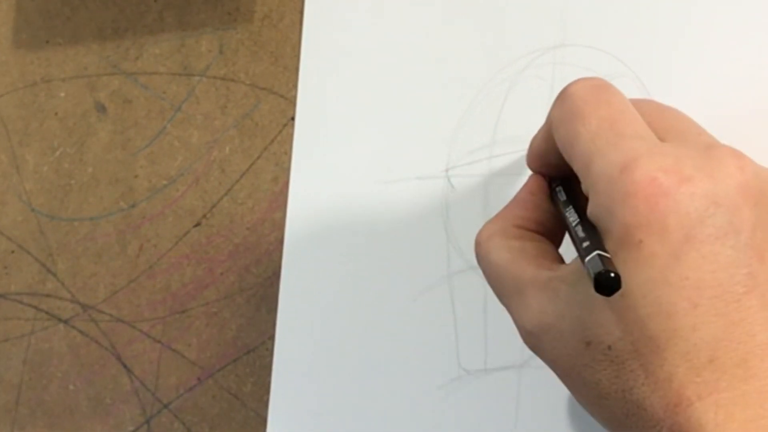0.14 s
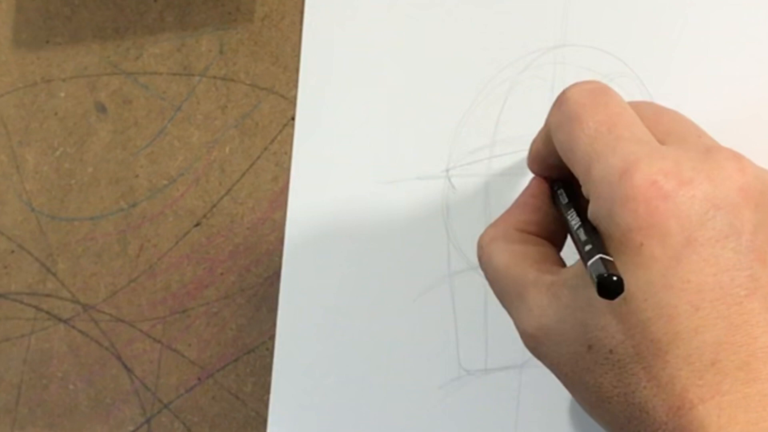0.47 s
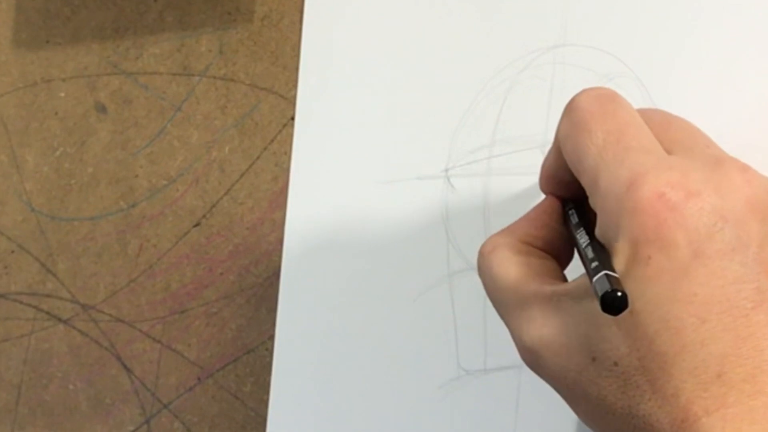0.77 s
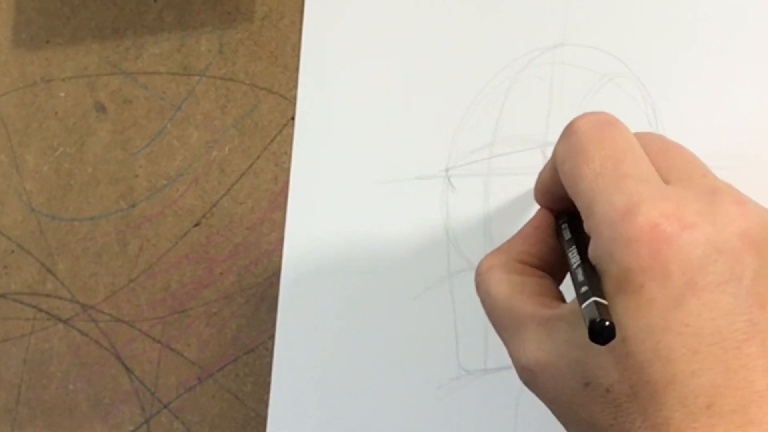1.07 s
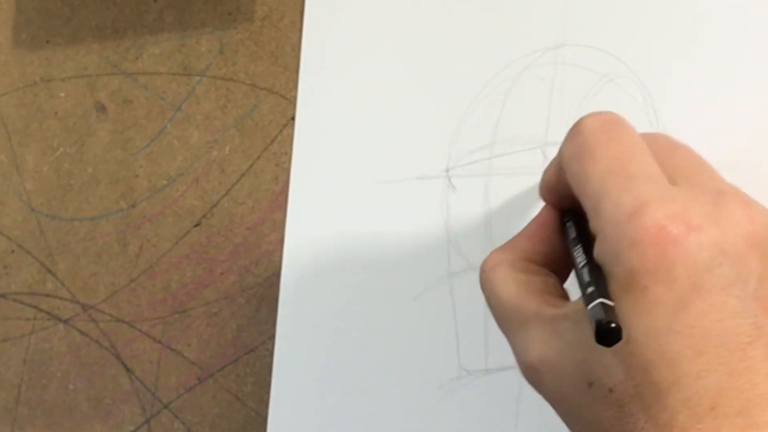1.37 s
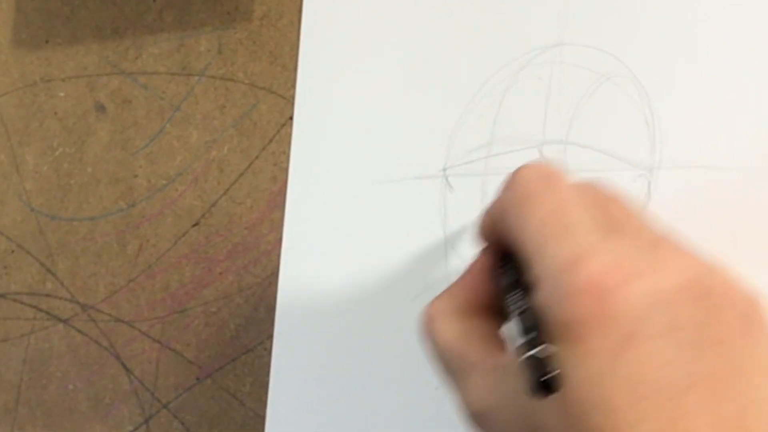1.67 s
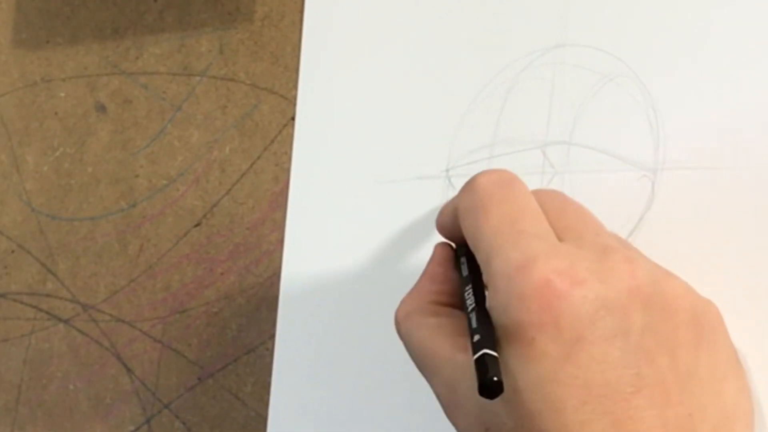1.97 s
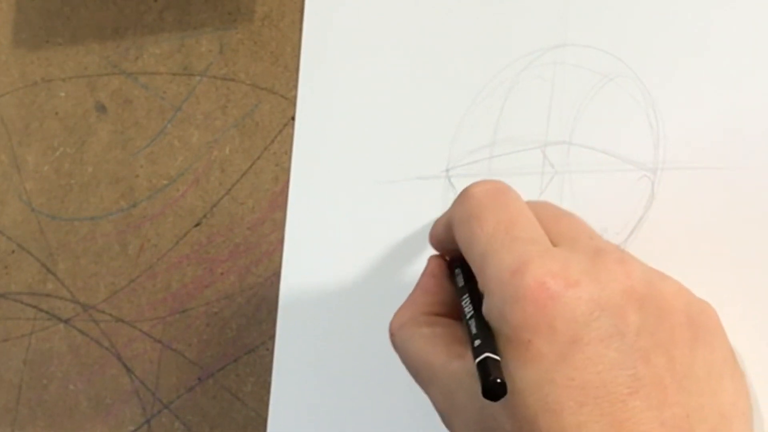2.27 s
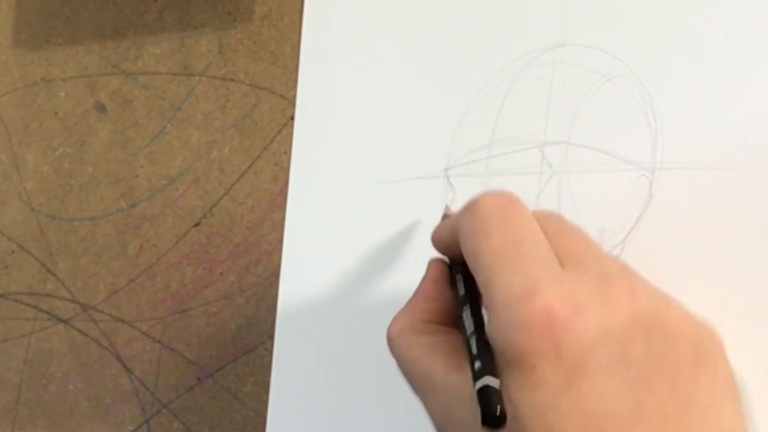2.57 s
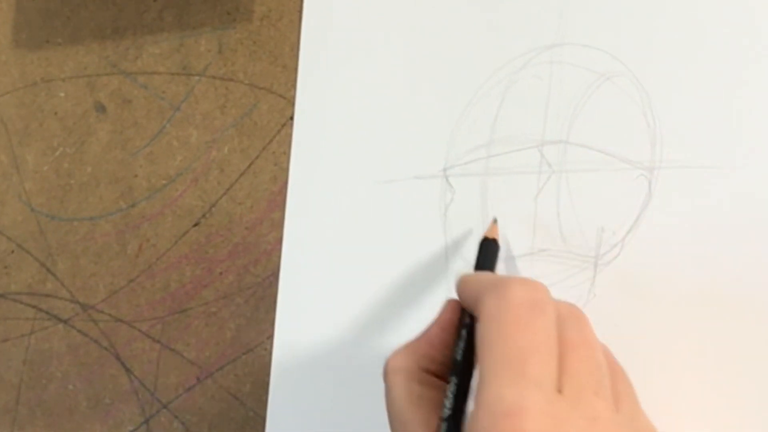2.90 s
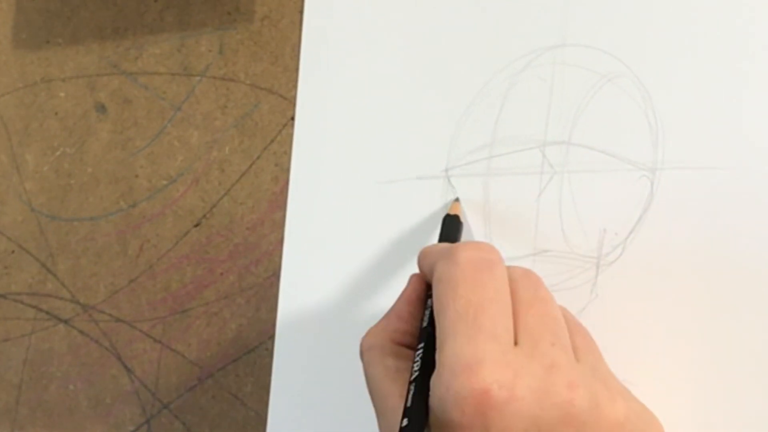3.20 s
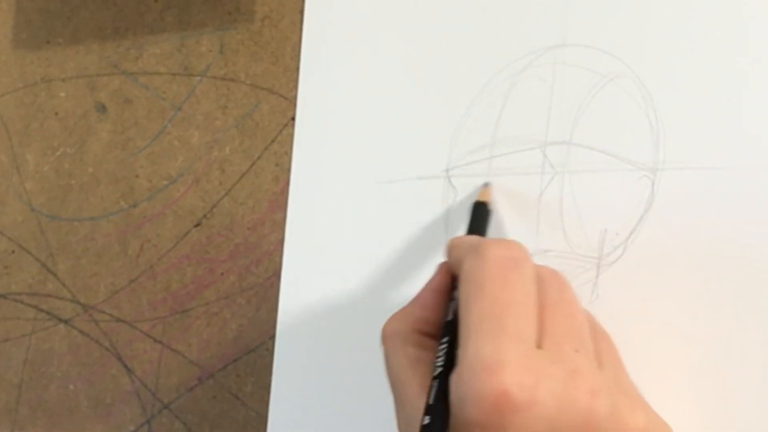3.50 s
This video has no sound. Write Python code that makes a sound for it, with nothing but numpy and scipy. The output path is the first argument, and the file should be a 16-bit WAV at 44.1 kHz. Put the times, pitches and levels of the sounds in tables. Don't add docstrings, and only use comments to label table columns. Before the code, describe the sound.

Pencil on paper, close and mono: four light, quick scratches at 0.05-0.6 s, then a dull bump and faint hand brush. Firmer strokes at 1.0-1.45 s lead to an airy slide with soft bumps until 1.8 s. Brisk, brighter strokes run 2.0-2.4 s, then hand brushes until 3.1 s with tiny paper ticks. Overlapping scratches finish at 3.3-3.65 s over quiet room rumble, distant drone and hiss.

```python
import sys
import numpy as np
from scipy import signal
from scipy.fft import rfft, irfft
from scipy.io import wavfile
from scipy.ndimage import uniform_filter1d

SR = 44100
rng = np.random.default_rng(int(sys.argv[2]) if len(sys.argv) > 2 else 0)


def convert_level_to_amplitude(level_db):
    exponent = np.asarray(level_db, float) / 20
    return 10 ** exponent


def log_audio(samples):
    frames = np.atleast_2d(samples).T
    limited = np.clip(frames, -1, 1)
    pcm = np.round(limited * 32767).astype(np.int16)
    wavfile.write(sys.argv[1], SR, pcm)


N = 160965

# start in seconds, length in seconds,
# shaft level in dB, upper shaft modes in dB relative to the lower, desk level in dB.
STROKES = [
    [(.06, 0.068, -77, 1, -66), (.095, 0.22, -73.5, 4, -64.5), (.268, 0.17, -73, 2.5, -62),
     (.455, 0.17, -70, 3, -62.5)],
    [(.97, 0.1, -78, -10, -77), (1.085, 0.14, -64, -1, -54), (1.212, 0.13, -66, -1, -55.5),
     (1.335, 0.11, -64, -1, -55), (3.3, 0.26, -68.5, -6, -63.5), (3.355, 0.17, -66, -12.5, -65.5),
     (3.37, 0.069, -76, -12, -53.5), (3.525, 0.17, -69.5, -4, -63)],
    [(1.96, 0.12, -85, -13.5, -79.5), (2.055, 0.13, -61, -5, -58.5), (2.2, 0.12, -65.5, -2.5, -60.5),
     (2.308, 0.089, -61, -2.5, -57), (2.398, 0.033, -73, -2, -80)],
]
# frequency in Hz, width in Hz, level in dB at each of the three places.
SHAFT_LOW = [(5890, 1060, -15, -10.5, -14.5), (7700, 1200, -13, -20.5, -22), (9300, 640, -6, -3, -0.5),
             (9910, 1060, -2.5, -7.5, -8.5), (11480, 1700, -6, -12, -12.5)]
# frequency in Hz, width in Hz, level in dB at each place.
SHAFT_HIGH = [(12300, 1000, -8, -11, -3), (13300, 1100, -11, -1, 5.5), (13120, 850, 0.5, -11, -15),
              (14300, 2100, -6, -8, -5)]
# frequency in Hz, width in Hz, level in dB at each of the three places.
DESK_MODES = [(147, 25, -5, -9, -10), (250, 20, -10, -6.5, -4.5), (285, 13.5, -9, -8, -6),
              (436, 50, -5.5, -2.5, -2.5), (606, 41, -2.5, -3, -1), (689.6, 42, -0.5, -3.5, -5.5),
              (893, 135, -4.5, -7.5, -12.5), (1170, 124, 0.5, -8.5, -6.5), (1520, 690, -1, -7.5, -5),
              (2167, 570, -6, -9.5, -7.5), (2590, 210, -13, -15, -16.5), (3260, 480, -9.5, -20.5, -15.5)]
# start in seconds, length in seconds, level in dB, frequency in Hz, width in Hz.
DIGS = [(0.067, 0.19, -74, 1190, 160), (0.13, 0.08, -78, 2050, 200), (0.273, 0.16, -68, 1225, 130),
        (0.27, 0.11, -68, 620, 90), (0.309, 0.13, -65.5, 285, 40), (0.456, 0.15, -74.5, 3145, 150),
        (0.482, 0.12, -80, 646, 70), (0.47, 0.087, -71, 175, 40), (0.604, 0.088, -63.5, 220, 109),
        (1.111, 0.11, -59, 603, 70), (1.221, 0.068, -57.5, 610, 120), (1.24, 0.039, -55, 460, 60),
        (1.345, 0.088, -66.5, 490, 90), (1.28, 0.05, -66, 290, 60), (1.36, 0.05, -76, 2580, 200),
        (1.462, 0.053, -66.5, 260, 180), (2.07, 0.12, -68, 612, 70), (2.187, 0.069, -72, 300, 50),
        (2.314, 0.077, -63.5, 620, 100), (3.376, 0.071, -56.5, 590, 160), (3.326, 0.12, -60.5, 257, 40),
        (3.38, 0.055, -70.5, 3000, 1800), (3.54, 0.18, -64, 270, 70), (3.604, 0.03, -76, 1250, 150)]
# start in seconds, length in seconds, fine hiss in dB, coarse rub in dB,
# share of the length spent speeding up.
SLIDES = [
    (0.705, 0.33, -73, -73.5, 0.38),
    (1.42, 0.4, -57.5, -69.5, 0.47),
    (2.43, 0.41, -60.5, -69, 0.22),
    (2.75, 0.36, -65.5, -73, 0.42),
]
# frequency in Hz, width in Hz, level in dB in each of the four slides.
SHEET_FINE = [(6100, 10000, -14, -10.5, -9.5, -9.5), (10550, 2300, -1, -1, -1.5, 0),
              (13300, 3600, -3, -1, -2, -1.3), (15250, 2000, -6, -3, -4, -4.5)]
# frequency in Hz, width in Hz, level in dB.
SHEET_COARSE = [(300, 280, -14), (760, 230, -5), (1570, 310, -2), (1970, 450, -5.5), (3270, 960, -5.5)]
# start in seconds, length in seconds, level in dB.
DRAGS = [
    [(0.99, 0.18, -69), (1.27, 0.079, -63), (1.43, 0.19, -68), (2.965, 0.087, -70), (2.97, 0.53, -67)],
    [(2.7, 0.05, -74), (2.75, 0.1, -80), (2.86, 0.18, -81)],
    [(1.5, 0.25, -68.5), (2.5, 0.14, -66), (2.865, 0.21, -79)],
]
# frequency in Hz, width in Hz, level in dB under each of the three pressures.
WRIST_MODES = [(270, 90, -6, -32.5, -30), (636, 260, -2.5, -27, -3), (950, 210, -0.5, -32, -20),
               (1153, 120, -10, -30, -9), (1422, 210, -5.5, -27, 2), (1668, 90, -4, -27, -0.5),
               (2025, 510, -20, -18, 3.5), (2590, 180, -20, -13, -3.5), (3480, 550, -25, 5, -12.5)]
# time in seconds, peak in dB, pulse width in seconds.
SNAPS = [(1.4733, -52, .0002), (1.7792, -46, .000035), (3.103, -47.5, .000035), (3.206, -53, .00003),
         (3.617, -50, .00005)]
# time in seconds, level in dB, frequency in Hz.
BUMPS = [(0.616, -54, 232), (.64, -49.5, 150), (1.465, -51.5, 300), (1.483, -47.5, 166), (1.232, -49, 620),
         (2.25, -48, 286)]
# frequency in Hz, width in Hz, level in dB.
DRONE = [(37, 38.4, 1.5), (62, 13.7, 4.5), (80.5, 33, -6), (171, 5.3, -13)]
# frequency in Hz, level in dB per Hz.
ROOM_COLOUR = [(50, -25.5), (90, -4.5), (200, -6), (500, -14.5), (1100, -18.5), (2300, -23), (6000, -25),
               (15500, -27)]
# time in seconds, level in dB.
RUMBLE = [(0.0, -51.5), (0.38, -48), (0.4, -53.5), (1.071, -48), (1.26, -57.5), (1.36, -40), (1.41, -48),
          (2.3, -50.5), (2.36, -64), (2.45, -42.5), (3.0, -51), (3.65, -55)]
# time in seconds, low edge in Hz, high edge in Hz, level in dB.
SPECKS = [(.72, 5300, 6200, -84), (.836, 7700, 8900, -82), (1.625, 12500, 13700, -72),
          (1.65, 10400, 12300, -69), (1.65, 6400, 8200, -76), (2.695, 5800, 8200, -79),
          (2.695, 13900, 15100, -79), (2.81, 14600, 15700, -79)]

SHAFT_SLIPS_PER_S, SHAFT_SPREAD_DB, SHAFT_FLICKER_DB, SHAFT_TAIL_S = 18000, 1.1, 0.8, 0.011
DESK_SLIPS_PER_S, DESK_SPREAD_DB, DESK_FLICKER_DB, DESK_TAIL_S = 9000, 1.0, 1.3, 0.03
DRONE_DB, ROOM_DB = -63.5, -66.5
RUMBLE_HZ = 17.3
SPECK_S = 1500 / SR
TOP_HZ = 15850


def level(x, db):
    return x * convert_level_to_amplitude(db) / np.sqrt(np.mean(x ** 2))


def ring(x, modes, count=0, order=1):
    out = 0
    for k, (hz, width, *db) in enumerate(modes):
        y = x
        for _ in range(order):
            y = signal.lfilter(*signal.iirpeak(hz, hz / width, SR), y)
        out = out + (-1) ** k * level(y, db[count])
    return level(out, 0)


def walk(rate):
    k = int(SR / rate)
    held = np.repeat(rng.standard_normal(N // k + 1), k)
    return 1.3 * uniform_filter1d(uniform_filter1d(held, k), k)[:N]


def gesture(start, length, rise, fall, sag_db):
    u = (np.arange(N) / SR - start) / length
    edge = np.clip(np.minimum(u / rise, (1 - u) / fall), 0, 1)
    return np.sin(np.pi / 2 * edge) ** 2 * convert_level_to_amplitude(sag_db * np.clip(u, 0, 1))


def slips(per_s, spread_db):
    hit = rng.random(N) < per_s / SR
    size = convert_level_to_amplitude(spread_db * rng.exponential(size=N))
    return level(hit * rng.standard_normal(N) * size, 0)


def linger(envelope, tail_s):
    keep = np.exp(-1 / (tail_s * SR))
    stored = signal.lfilter([1 - keep], [1, -keep], envelope ** 2)
    return np.sqrt(0.5 * envelope ** 2 + 0.5 * stored)


def pencil():
    fine = slips(SHAFT_SLIPS_PER_S, SHAFT_SPREAD_DB) * convert_level_to_amplitude(SHAFT_FLICKER_DB * walk(70))
    coarse = slips(DESK_SLIPS_PER_S, DESK_SPREAD_DB) * convert_level_to_amplitude(DESK_FLICKER_DB * walk(45.03))
    out = 0
    for place, strokes in enumerate(STROKES):
        low, high, desk = np.zeros((3, N))
        for start, length, shaft_db, upper_db, desk_db in strokes:
            speed = gesture(start, length, rise=0.24, fall=0.46, sag_db=-3.5)
            low = low + convert_level_to_amplitude(shaft_db) * speed
            high = high + convert_level_to_amplitude(shaft_db + upper_db) * speed
            desk = desk + convert_level_to_amplitude(desk_db) * speed
        out = out + linger(low, SHAFT_TAIL_S) * ring(fine, SHAFT_LOW, count=place, order=2)
        out = out + linger(high, SHAFT_TAIL_S) * ring(fine, SHAFT_HIGH, count=place, order=2)
        out = out + linger(desk, DESK_TAIL_S) * ring(coarse, DESK_MODES, count=place)
    return out


def digs():
    grain, out = slips(DESK_SLIPS_PER_S, DESK_SPREAD_DB), 0
    for start, length, db, hz, width in DIGS:
        push = gesture(start, length, rise=0.21, fall=0.43, sag_db=-2.9)
        out = out + convert_level_to_amplitude(db) * push * ring(grain, [(hz, width, 0)], order=2)
    return out


def hand():
    grain = slips(18000, 1.0) * convert_level_to_amplitude(0.6 * walk(40))
    rub = ring(slips(6000, 0.95), SHEET_COARSE)
    out = 0
    for slide, (start, length, fine_db, coarse_db, rise) in enumerate(SLIDES):
        speed = gesture(start, length, rise, fall=1 - rise, sag_db=0)
        swell = 0.33 * speed + 0.45 * speed ** 1.98
        hiss = swell * ring(grain, SHEET_FINE, count=slide)
        out = out + convert_level_to_amplitude(fine_db) * hiss + convert_level_to_amplitude(coarse_db) * speed * rub
    return out


def wrist():
    rub, out = slips(5000, 0.84) * convert_level_to_amplitude(0.7 * walk(35)), 0
    for pressure, drags in enumerate(DRAGS):
        speed = 0
        for start, length, db in drags:
            speed = speed + convert_level_to_amplitude(db) * gesture(start, length, rise=0.2, fall=0.45, sag_db=-3.5)
        out = out + speed * ring(rub, WRIST_MODES, count=pressure, order=2)
    return out


def sheet_snaps():
    t, out = np.arange(N) / SR, 0
    for at, db, width_s in SNAPS:
        u = (t - at) / width_s
        pulse = np.exp(-0.5 * u ** 2) - np.exp(-0.5 * (u / 4) ** 2) / 4
        out = out - convert_level_to_amplitude(db) * pulse
    return out


def knuckle():
    t, out = np.arange(N) / SR, 0
    for at, db, hz in BUMPS:
        u = np.maximum(t - at, 0)
        envelope = np.exp(-u / 0.0067) * (1 - np.exp(-u / 0.003))
        out = out + convert_level_to_amplitude(db) * np.sin(2 * np.pi * hz * u) * envelope
    return out


def appliance():
    return convert_level_to_amplitude(DRONE_DB) * ring(rng.standard_normal(N), DRONE)


def room():
    hz = np.maximum(np.fft.rfftfreq(N, 1 / SR), 1)
    colour_hz, colour_db = np.array(ROOM_COLOUR).T
    colour = convert_level_to_amplitude(np.interp(np.log(hz), np.log(colour_hz), colour_db))
    air = irfft(rfft(rng.standard_normal(N)) * colour, N) * convert_level_to_amplitude(0.13 * walk(7.8))
    weight = (hz / 3.6) / (1 + hz / 1.6) / (1 + (hz / RUMBLE_HZ) ** 3.32)
    rumble = irfft(rfft(rng.standard_normal(N)) * weight, N)
    rumble = rumble / np.sqrt(uniform_filter1d(rumble ** 2, size=12000))
    swell = convert_level_to_amplitude(np.interp(np.arange(N) / SR, *np.array(RUMBLE).T))
    return level(air, ROOM_DB) + rumble * swell


def specks():
    out, t = np.zeros(N), np.arange(N) / SR
    for at, lo_hz, hi_hz, db in SPECKS:
        sos = signal.butter(6, [lo_hz, hi_hz], "bandpass", fs=SR, output="sos")
        band = signal.sosfilt(sos, rng.standard_normal(N))
        out = out + level(band, db) * np.cos(np.pi * np.clip((t - at) / SPECK_S, -0.5, 0.5))
    return out * np.array([[1], [-1]])


def scene():
    near = pencil() + digs() + hand() + wrist() + sheet_snaps() + knuckle()
    return np.tile(near + appliance() + room(), (2, 1))


def roll_off(x):
    return signal.sosfilt(signal.butter(12, 15680, fs=SR, output="sos"), x)


def record(dry):
    top_cut = signal.ellip(12, 0.1, 70, TOP_HZ, fs=SR, output="sos")
    mix = signal.sosfilt(top_cut, dry + specks())
    return roll_off(mix)


dry = scene()
out = record(dry)
log_audio(out)
```